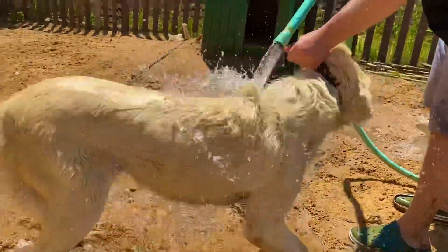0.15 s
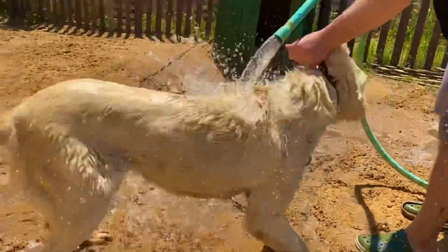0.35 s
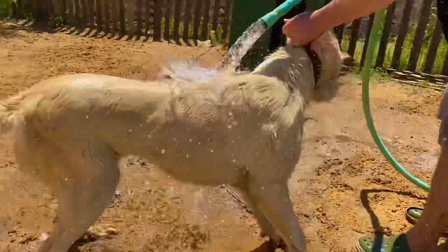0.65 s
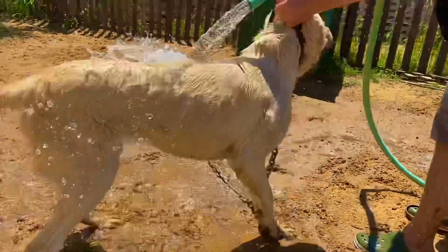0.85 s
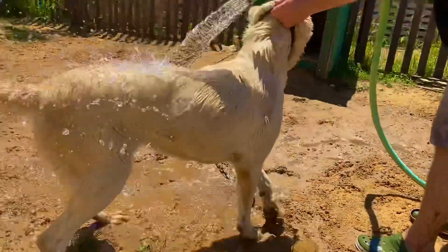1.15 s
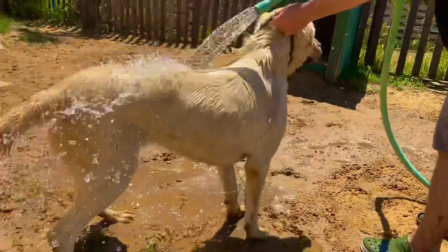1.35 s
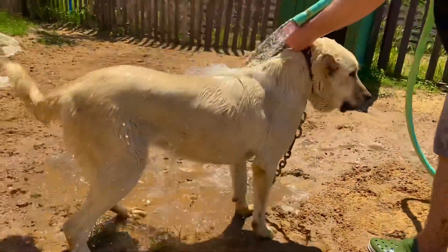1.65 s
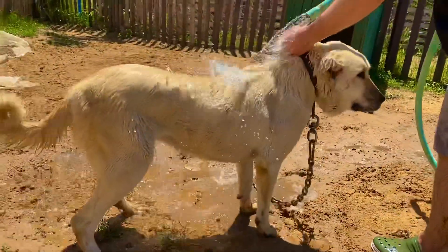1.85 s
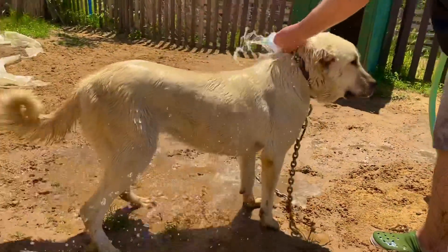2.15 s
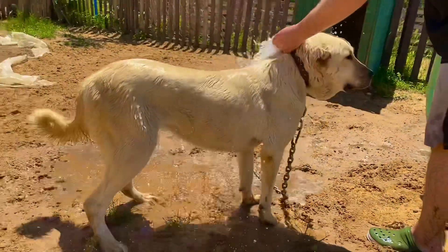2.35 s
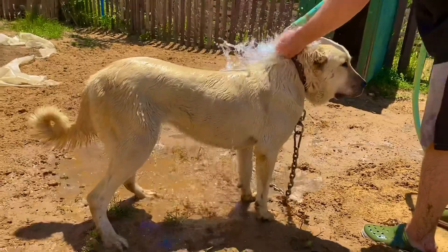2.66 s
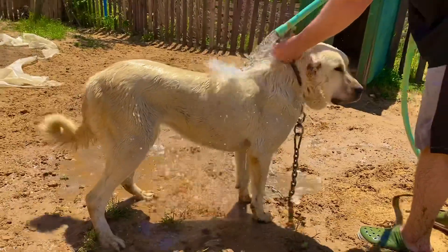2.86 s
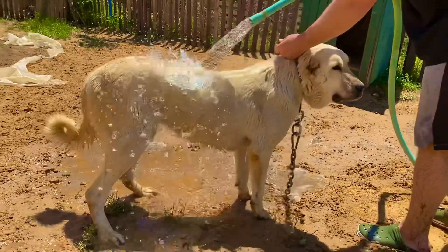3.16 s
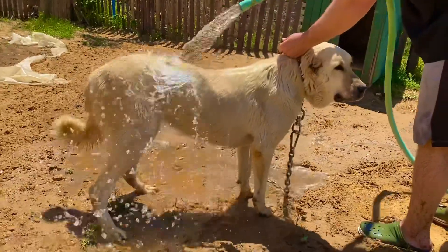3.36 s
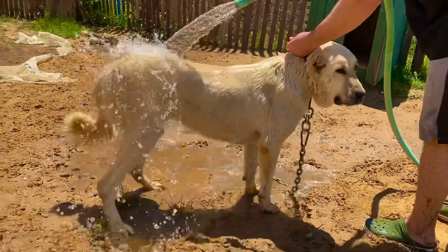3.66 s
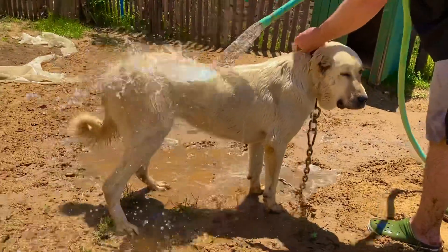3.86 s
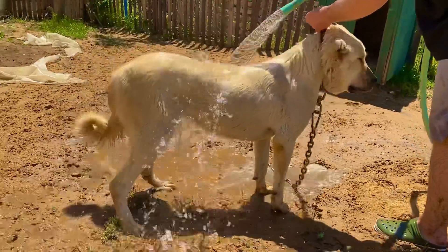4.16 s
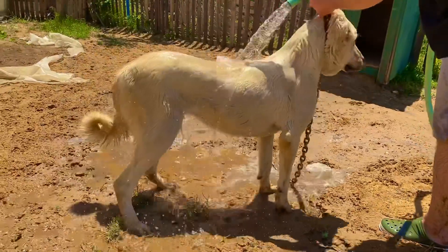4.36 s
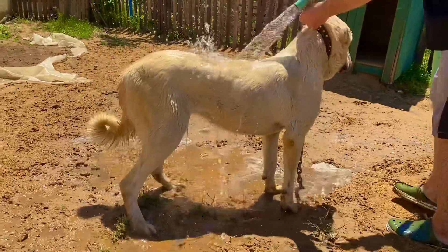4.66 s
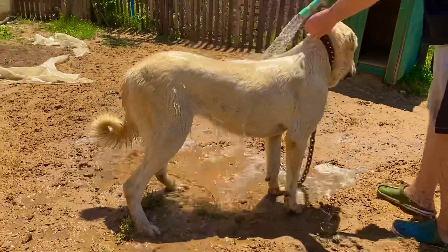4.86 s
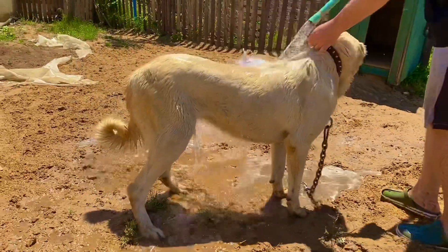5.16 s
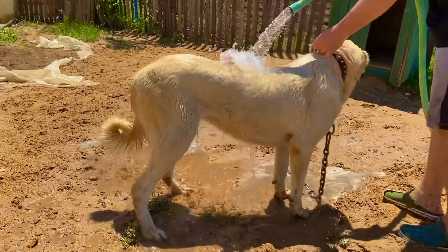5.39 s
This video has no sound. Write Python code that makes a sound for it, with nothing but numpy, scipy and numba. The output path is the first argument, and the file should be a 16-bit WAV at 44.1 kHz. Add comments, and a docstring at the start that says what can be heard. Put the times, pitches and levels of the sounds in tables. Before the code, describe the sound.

Water from a garden hose plays without pause on a large dog's wet coat in an open yard. Bright crackling drops and fine mist run throughout, with sharp wet smacks, while run-off patters and plops into mud. Low wind puffs bump the microphone often at first, thin out, return around three seconds and are strongest near the end. Phone a few metres away, dry open air.

```python
"""A hose jet plays on a big dog's wet coat in an open yard, a few metres from a phone, for 5.5 s.
Throughout, drops crackle on the fur over mist, lumps of water smack, and run-off patters and plops into mud.
Early on, wind puffs and low slops on the mud come often, then the wind thins; lumps smack hardest near 2.5 s,
plops crowd together near 2.8 s, wind returns around 3 s, and its strongest puffs come after 4.9 s.
Drops are short rings and noise ticks, lumps are noise bursts, wind is low noise with slow swings."""
import sys
import numpy as np
from scipy import signal
from scipy.fft import rfft, irfft, next_fast_len
from scipy.io import wavfile
from scipy.ndimage import uniform_filter1d
from numba import njit

SR = 44100
rng = np.random.default_rng(int(sys.argv[2]) if len(sys.argv) > 2 else 0)


def store_wav(level_fs):
    """Save 16-bit WAV to argv[1]."""
    pcm = np.round(np.clip(np.atleast_2d(level_fs), -1, 1) * 32767)
    wavfile.write(sys.argv[1], SR, pcm.T.astype(np.int16))


N = 243691  # length in samples
T = np.arange(N) / SR  # time [s]
FFT_SIZE = next_fast_len(N, True)  # padded length of the spectra
HZ = np.fft.rfftfreq(FFT_SIZE, 1 / SR) + 1  # the 1 keeps the logarithm finite


def undb(db):
    """Turn decibels into a plain gain."""
    return 10 ** (np.asarray(db) / 20)


def unit_level(x):
    """Scale both rows so that the first has an rms of 1."""
    return x / np.sqrt(np.mean(x[0] ** 2))


def colour(x, table, hiss_db=-99):
    """Even out a sound's spectrum, mix in some hiss, and give both the tone of a table."""
    table_hz, table_db = np.transpose(table)
    spectrum = rfft(x, FFT_SIZE)
    smooth_power = uniform_filter1d(np.abs(spectrum[0]) ** 2, size=1500)
    spectrum = spectrum / (np.sqrt(smooth_power) + 1e-9)
    hiss = rng.standard_normal((2, 2 * len(HZ))).view(complex) / np.sqrt(2)
    gain = undb(np.interp(np.log(HZ), np.log(table_hz), table_db, -80, -80))
    return irfft((spectrum + undb(hiss_db) * hiss) * gain, FFT_SIZE)[:, :N]


def walk(rate):
    """Random levels, each lasting 1 / rate seconds, joined by ramps; their spread is 1."""
    hold = int(SR / rate)
    steps = np.repeat(rng.standard_normal(N // hold + 1), hold)
    ramps = uniform_filter1d(steps, hold)[:N]
    return ramps / ramps.std()


@njit
def ring(start, hz, cycles, size, turn, glide, n, sr):
    """Rings that swell over their first cycles, die away and glide up; row two has another phase."""
    out = np.zeros((2, n))
    for k in range(len(start)):
        step = 2 * np.pi * hz[k] / sr
        fade = np.exp(-hz[k] / sr / cycles[k] * 3)  # down to about 1/20 after the given cycles
        length = int(2 * cycles[k] * sr / hz[k])
        swell_cycles = .6 + cycles[k] / 10
        gain, phase = size[k], 0.
        for i in range(start[k], min(start[k] + length, n)):
            phase += step * (1 + glide[k] * (i - start[k]) / length)
            gain *= fade
            swell = min(phase / (2 * np.pi * swell_cycles), 1.)
            out[0, i] += gain * swell * np.sin(phase)
            out[1, i] += gain * swell * np.sin(phase + turn[k])
    return out


def drops(per_s, lo_hz, hi_hz, cycles, spread_db, glide):
    """A rain of rings of random pitch and length (1 to 6 times cycles); most are small, a few large."""
    u = rng.random((int(per_s * N / SR), 5)).T
    start = (u[0] * N).astype(np.int64)
    hz = lo_hz * (hi_hz / lo_hz) ** u[1]
    size = undb(-spread_db * np.log(1 - .985 * u[2]))
    turn = 2 * np.pi * u[4]
    return ring(start, hz, cycles * 6 ** u[3], size, turn, np.full(len(hz), glide), N, 1. * SR)


def stream(table, grains, hiss_db, flutter_db):
    """Single drops over the hiss of those too fine to tell apart; the level flutters unevenly."""
    return unit_level(colour(grains, table, hiss_db)) * undb(flutter_db)


def burst(s, db, lo_hz, hi_hz, t60, rise=0.00027):
    """A short puff of noise in one band, peaking at db and falling 60 dB in t60 s; returns its place too."""
    t = np.arange(int(t60 * SR)) / SR
    band = signal.butter(2, [lo_hz, min(hi_hz, .45 * SR)], "band", fs=SR)
    noise = signal.lfilter(*band, rng.standard_normal((2, 4096))[:, :len(t)])
    puff = noise * (1 - np.exp(-t / rise)) * 1000 ** (-t / t60)
    return int(s * SR), puff / np.abs(puff).max(axis=1, keepdims=True) * undb(db)


def add(out, i, x):
    """Mix x into out at sample i."""
    n = min(x.shape[1], N - i)
    out[:, i:i + n] += x[:, :n]


def bumps(centre, width):
    """One smooth swell from 0 to 1 and back for each row; width [s] is taken at half height."""
    return np.cos(np.pi / 2 * np.clip((T - centre[:, None]) / width[:, None], -1, 1)) ** 2


def ground_dip(x):
    """The echo off the ground thins one band: take part of it out."""
    return x - 0.26 * signal.lfilter(*signal.iirpeak(2560, 3.5, fs=SR), x)


def wind():
    """Low turbulence: an uneven rumble, and puffs that each push the microphone for a few swings."""
    # tone of the moving air: (frequency [Hz], level per Hz [dB])
    gust_colour = [(20, -23), (35, -20), (50, 1.5), (70, -2.5), (110, -4), (170, -14.5), (300, -23)]
    # rumble before its random unevenness: (time [s], level [dB])
    rumble = [(0.0, -57), (0.2, -51), (0.8, -46.5), (1.55, -52), (1.95, -50), (2.2, -49), (2.61, -55),
              (2.86, -55), (2.95, -47), (3.17, -44), (3.59, -57.5), (4.77, -53.5), (5.09, -43), (5.53, -46)]
    # puffs hitting the microphone: (centre [s], width [s], peak of the swing [dB], pitch [Hz])
    puffs = [(0.012, 0.019, -40, 59), (0.18, 0.027, -39, 61), (0.181, 0.017, -33.5, 147.8),
             (0.371, 0.026, -41, 87.6), (0.47, 0.024, -33, 80), (0.547, 0.03, -43, 64),
             (0.61, 0.029, -36.5, 78), (0.653, 0.034, -42, 70), (0.73, 0.034, -46, 80),
             (0.774, 0.02, -43, 80), (0.818, 0.014, -41, 86), (0.854, 0.035, -44, 61),
             (0.908, 0.023, -32, 83), (0.96, 0.014, -31.5, 69), (1.044, 0.018, -44, 69),
             (1.096, 0.047, -43, 59), (1.161, 0.015, -37.5, 78), (1.239, 0.022, -32.5, 67.1),
             (1.944, 0.021, -34, 86.3), (1.988, 0.014, -32, 80), (2.301, 0.014, -39, 67),
             (2.34, 0.016, -40, 60), (2.925, 0.032, -39, 75), (2.974, 0.052, -37, 64),
             (3.059, 0.046, -48, 59), (3.169, 0.02, -32, 64), (3.199, 0.012, -37, 61),
             (3.235, 0.037, -36, 48), (3.3, 0.057, -33, 74.8), (3.403, 0.031, -28, 59.3),
             (3.465, 0.022, -45, 50), (3.67, 0.03, -43, 96), (4.283, 0.063, -43, 75),
             (4.422, 0.039, -43, 96), (4.59, 0.039, -42, 78.4), (4.735, 0.043, -43, 57),
             (4.788, 0.031, -37, 64), (4.881, 0.017, -41, 59.2), (4.913, 0.011, -30, 97),
             (4.955, 0.038, -26, 75.2), (5.006, 0.037, -30, 74), (5.165, 0.066, -35, 51),
             (5.185, 0.013, -36, 98), (5.238, 0.041, -37, 53.3), (5.272, 0.025, -36, 56),
             (5.32, 0.016, -36, 121), (5.396, 0.036, -29, 74.6), (5.459, 0.029, -25.5, 88.05),
             (5.502, 0.025, -26, 58.9)]
    tail = 1.15  # squeezes the rise of a puff and stretches its fall by this ratio
    sag = 0.23  # share of its pitch that a puff loses over one width
    rough_db = -12  # turbulence riding on each puff
    air = unit_level(colour(rng.standard_normal((2, N)), gust_colour))
    out = air * undb(np.interp(T, *np.transpose(rumble)) + 3.2 * walk(11))
    turns = 2 * np.pi * rng.random((len(puffs), 2, 1))
    for (centre, width, db, hz), turn in zip(puffs, turns):
        near = np.abs(T - centre) < width * tail
        u = (T[near] - centre) / width
        skewed = np.where(u < 0, u * tail, u / tail)
        shape = undb(db) * np.cos(np.pi / 2 * np.clip(skewed, -1, 1)) ** 2
        swing = np.sin(2 * np.pi * hz * width * (u - sag * u ** 2 / 2) + turn)
        out[:, near] += shape * (swing + undb(rough_db) * air[:, near])
    return out


def pour(slugs):
    """Dull run-off on mud: low, very short rings almost lost in hiss, nearly steady."""
    # tone: (frequency [Hz], level per Hz [dB])
    pour_colour = [(90, 2.5), (150, -3.5), (300, -2.5), (500, -4.5), (800, -6.5), (1200, -14)]
    grains = drops(300, 124, 922, cycles=1.07, spread_db=0.95, glide=0.14)
    return stream(pour_colour, grains, -0.12, 0.12 * slugs + 0.15 * walk(28))


def patter(slugs):
    """Run-off drops: short rings in the middle range over some hiss."""
    # tone: (frequency [Hz], level per Hz [dB])
    patter_colour = [(600, -23), (950, -10), (1250, -6), (1650, -4), (2100, -5.5), (2600, -12.5),
                     (3500, -8.5)]
    grains = drops(800, 796, 2860, cycles=2.6, spread_db=1.8, glide=0.2)
    return stream(patter_colour, grains, -4, 0.7 * slugs + 0.8 * walk(60))


def slops():
    """Heavy water on soft ground: broad low thuds of noise that rise gently."""
    # thuds: (time [s], peak [dB], centre of the band [Hz])
    thuds = [(0.169, -32, 153), (0.176, -28, 420), (0.262, -32.5, 280), (0.368, -28, 610), (0.45, -29, 300),
             (0.555, -30.5, 480), (0.644, -30.5, 248), (1.339, -33, 208), (1.975, -37, 403),
             (2.256, -33.5, 305), (3.303, -39, 145), (4.171, -38, 423), (4.185, -29, 480), (4.21, -32, 500),
             (4.548, -39, 320), (4.8, -34, 545), (4.922, -44, 500)]
    out = np.zeros((2, N))
    for s, db, hz in thuds:
        add(out, *burst(s, db, hz / 2.1, hz * 2.13, t60=0.051, rise=0.0059))
    return out


def plops():
    """Drops trap air in the puddle: a rough splash, and a bubble that rings briefly and rises in pitch."""
    # bubbles: (time [s], level before fading [dB], nominal pitch [Hz], length [cycles], pitch rise [share])
    bubbles = [(0.1307, -27.5, 1060, 12, 0.05), (0.1715, -30, 1080, 8.6, 0.05), (0.177, -16, 2260, 6, 0.05),
               (0.3112, -27, 1255, 8.7, 0.77), (0.3427, -24, 1860, 13, 0.05), (0.357, -29, 1290, 20, 0.05),
               (0.3712, -26, 1420, 6.8, 0.05), (0.4949, -27, 900, 5.2, 0.29), (0.5027, -23, 2010, 12, 0.35),
               (0.5596, -29.5, 1110, 24, 1.4), (0.6155, -21, 2080, 13, 0.05),
               (0.6255, -18, 2110, 7.7, 0.05), (0.651, -24, 1440, 5.6, 0.18),
               (0.7196, -25, 1980, 17.8, 0.05), (0.74, -21, 1600, 5.4, 0.3), (0.7459, -15, 1690, 7.3, 0.28),
               (0.8095, -18, 1710, 6.5, 0.05), (1.061, -14.5, 2260, 8.4, 0.06),
               (1.37, -16.5, 2480, 12, 0.27), (1.3737, -20, 1600, 7.9, 0.05),
               (1.3896, -16, 1610, 8.9, 0.24), (1.5034, -28, 1000, 7.7, 0.05),
               (1.5787, -26, 1490, 7.7, 1.1), (1.5775, -19, 2250, 8, 0.28), (1.7383, -18, 1530, 5.8, 0.05),
               (1.75, -22.5, 1560, 18, 0.74), (1.866, -16.5, 1480, 7.6, 0.17), (1.9376, -20, 2060, 9, 0.06),
               (1.9843, -25, 890, 5, 0.29), (2.0665, -17.5, 2110, 6.8, 0.05), (2.113, -19, 2470, 8.1, 0.08),
               (2.269, -24, 2080, 8.1, 0.05), (2.317, -25, 1980, 13.3, 0.05),
               (2.4517, -19, 1890, 6.6, 0.05), (2.5168, -16.5, 2100, 8.6, 0.09),
               (2.554, -25.5, 1810, 6.2, 0.07), (2.6031, -28, 1980, 8.3, 0.05),
               (2.765, -29, 1110, 10.7, 0.05), (2.7807, -28, 1300, 9, 0.3), (2.751, -23, 1700, 8, 0.1),
               (2.7885, -27, 1630, 15, 0.05), (2.7942, -17, 1710, 6, 0.05), (2.801, -25, 1550, 8.3, 0.1),
               (2.83, -35, 1040, 12, 0.05), (2.845, -21, 1790, 8.7, 0.1), (2.859, -25, 1110, 12, 0.1),
               (2.8218, -29, 1090, 25, 0.05), (2.824, -31, 1700, 17.8, 0.77), (2.8238, -26, 1940, 20, 0.81),
               (2.837, -15.5, 1600, 8.2, 0.05), (2.851, -16, 1007, 9.3, 0.05), (2.8574, -20, 1650, 7, 0.2),
               (2.986, -29, 1280, 11, 0.05), (3.1139, -24, 1850, 7.9, 0.05), (3.15, -21.5, 1860, 7.4, 0.07),
               (3.2376, -22, 2300, 8.1, 0.05), (3.2675, -26, 1870, 8.0, 0.05),
               (3.4157, -28, 1120, 14, 0.55), (3.4347, -32, 1110, 17.8, 0.05), (3.517, -30, 1090, 11, 0.05),
               (3.528, -29, 1140, 17, 0.043), (3.539, -20, 1120, 5.5, 0.05),
               (3.5832, -17.5, 1360, 6.5, 0.05), (3.603, -29, 1060, 9.5, 0.06),
               (3.6594, -27, 1500, 17, 0.78), (3.707, -29, 1470, 17.8, 1), (3.715, -28, 1170, 11, 0.1),
               (3.725, -26, 1780, 10, 0.1), (3.746, -28, 1670, 11, 0.05), (3.757, -28, 1650, 13, 0.05),
               (3.775, -26, 1500, 12, 0.05), (3.792, -29, 1650, 6.1, 0.1), (3.92, -29.5, 1030, 14, 0.81),
               (3.943, -19.5, 1830, 7.4, 0.19), (3.962, -26.5, 1730, 27, 0.11),
               (4.0276, -16, 1840, 9.4, 0.16), (4.2094, -24, 1670, 21, 0.05), (4.225, -31, 944, 17, 0.6),
               (4.2319, -18, 1790, 6.2, 0.05), (4.248, -31, 1130, 17, 0.97), (4.2863, -22, 2150, 8.7, 0.05),
               (4.38, -24, 2110, 6.8, 0.05), (4.4626, -24.5, 1770, 35, 0.11), (4.5023, -19, 1750, 12, 0.05),
               (4.5615, -24, 1120, 9.2, 0.05), (4.663, -25.5, 1680, 16.3, 0.05),
               (4.6846, -28, 1770, 21, 0.7), (4.7653, -23.5, 1670, 28, 0.05),
               (4.7881, -34, 1350, 17.5, 0.05), (4.8016, -22, 1290, 8.8, 0.25),
               (4.8076, -27, 1770, 23, 0.05), (4.861, -22, 1240, 6, 0.05), (4.93, -14.5, 1590, 8.1, 0.05),
               (4.9922, -27, 2150, 22, 0.4), (4.997, -27, 1020, 7.6, 0.75), (5.022, -23.5, 1120, 6.5, 0.12),
               (5.0937, -24, 1260, 14, 0.31), (5.1095, -27, 1360, 16.3, 1.4),
               (5.113, -16.5, 2150, 13, 0.06), (5.139, -25, 1060, 10.4, 0.37),
               (5.3156, -28, 1690, 17.8, 0.05), (5.3613, -23, 1720, 16, 0.15),
               (5.412, -21, 1600, 6.6, 0.05), (5.439, -23, 2070, 6.7, 0.05)]
    splash_db, splash_t60 = -9, 0.013  # relative to the bubble; fall time [s]
    s, db, hz, cycles, glide = np.transpose(bubbles)
    turn = np.pi / 2 * np.sign(rng.standard_normal(len(s)))  # a quarter cycle early or late
    start = (s * SR).astype(np.int64)
    start_hz = hz * (1 - glide / 6)
    out = ring(start, start_hz, np.maximum(cycles, 1), undb(db), turn, glide, N, 1. * SR)
    for k in range(len(s)):
        add(out, *burst(s[k], db[k] + splash_db, hz[k] / 1.83, hz[k] * 2, splash_t60, rise=0.00043))
    return out


def mist(slugs):
    """Fine mist: many tiny high rings over nearly as much hiss."""
    # tone: (frequency [Hz], level per Hz [dB])
    mist_colour = [(6000, -6), (8000, 3.5), (9500, 1.5), (12000, 3), (14000, 0.5), (16000, -3)]
    grains = drops(2500, 6980, 15200, cycles=4.2, spread_db=3.6, glide=0.056)
    return stream(mist_colour, grains, -1, slugs + 1.1 * walk(90))


def ticks(per_s=600, spread_db=3.2, decay_s=.0005):
    """Single drops bursting at random: noise opened for a millisecond or two."""
    # broad tone of a drop: (frequency [Hz], level per Hz [dB])
    tick_colour = [(700, -11.5), (1500, -4), (2100, -3), (2650, -10), (3300, -3), (4500, -0.5),
                   (7000, -10.5), (12000, -6.5), (16000, -4.5)]
    u = rng.random((int(per_s * N / SR), 2)).T
    gate = np.zeros(N)
    gate[(u[0] * N).astype(int)] = undb(-spread_db * np.log(1 - .97 * u[1]))
    fade = np.exp(-1 / (decay_s * SR))
    gate = signal.lfilter([1], [1, -fade], uniform_filter1d(gate, size=10))
    return unit_level(colour(gate * rng.standard_normal((2, N)), tick_colour))


def spray(slugs):
    """Spray crackling off the fur: a dense rain of bright short rings over some hiss."""
    # tone: (frequency [Hz], level per Hz [dB])
    spray_colour = [(1800, -11.5), (2500, -7.5), (3200, -4.5), (4300, -0.5), (5300, 1), (6400, -3),
                    (7800, -7), (9500, -40), (12000, -17)]
    grains = drops(3600, 2214, 8830, cycles=1.7, spread_db=2.8, glide=0.16)
    return stream(spray_colour, grains, -6, slugs + 0.3 * walk(50))


def small_smacks(count):
    """Lesser lumps at random moments, in the same columns as the large ones."""
    u = rng.random((count, 4)).T
    db = -28 + 3 * (2 * u[1] - 1)
    hz = 3020 * (7000 / 3020) ** u[2]
    mist_db = np.full(count, -17)
    return list(zip(u[0] * N / SR, db, hz, mist_db, 8 * u[3] - 3))


def snap(lo_hz, hi_hz):
    """The clean edge of a hit: one click through a wide band, peak 1, upside down in row two."""
    band = signal.butter(2, [lo_hz, hi_hz], "band", fs=SR)
    click = signal.lfilter(*band, np.eye(1, 200)[0])
    return np.array([click, -click]) / np.abs(click).max()


def smacks(t60=0.012):
    """Lumps of water burst on the coat: each snaps, rings noisily around its centre and throws some mist."""
    # lumps: (time [s], body peak before the row balance [dB], centre [Hz], mist relative to the body [dB],
    # first row minus second row [dB])
    lumps = [(0.0233, -23.5, 5400, -13, -2), (0.1094, -25, 3730, -8, -1), (0.1277, -21, 4810, -9, 4),
             (0.1325, -14.5, 4800, -16, 7), (0.2337, -19.5, 3390, -17, 0), (0.29, -22, 5630, -1, 3),
             (0.3177, -18, 3350, -11, -3), (0.3243, -21, 5840, -10, -1), (0.3341, -20, 4870, -12, 5),
             (0.3622, -18, 5310, -14, 4), (0.3732, -23, 4890, -8, 4), (0.4546, -23, 4100, -13, 1),
             (0.476, -23, 4320, -15, -1), (0.4796, -21, 3790, -8, -1), (0.4978, -25, 4020, -14, -3),
             (0.5032, -21, 4810, -11, 3), (0.508, -25, 4620, -9, 0), (0.5188, -20, 4840, -19, 0),
             (0.5472, -17, 6100, -16, 1), (0.5924, -24, 5010, -14, -1), (0.6159, -24, 4130, -8, 4),
             (0.6262, -21, 4090, -9, -1), (0.651, -20, 3740, -13, -1), (0.6543, -22, 5090, -17, 2),
             (0.672, -27, 5400, -7, 4), (0.6788, -22, 4860, -13, 5), (0.8114, -14, 4300, -24, 0),
             (0.8708, -22, 4280, -3, -1), (0.892, -23, 4080, -14, 0), (0.8954, -25, 4430, -9, 0),
             (0.9736, -28, 4600, -15, 9), (1.0244, -27, 4240, -14, 0), (1.0513, -19, 4800, -6, 5),
             (1.0703, -19, 6110, -15, -1), (1.2317, -25, 5970, -8, -3), (1.2628, -19, 5230, -16, -2),
             (1.3267, -18, 5600, -21, 5), (1.35, -19, 5920, -9, -1), (1.3783, -25, 2970, -14, 4),
             (1.3898, -22, 5790, -13, 2), (1.4253, -24, 5900, -4, 0), (1.4313, -17, 5660, -4, 1.5),
             (1.4549, -22, 5230, -13, 7), (1.4884, -21, 4390, -20, 0), (1.5193, -28, 3510, -19, -5),
             (1.5336, -16, 3930, -22, 1), (1.5755, -27, 4990, -15, -1), (1.6447, -23, 4290, -14, 2),
             (1.6517, -22, 3500, -16, 0), (1.6832, -21, 3720, -19, -1), (1.8233, -21, 3710, -10, -4),
             (1.8616, -23, 4210, -13, -5), (1.8773, -21, 3880, -14, 0), (2.0022, -21, 7020, -10, 0),
             (2.0676, -21, 5680, -4, 4), (2.1177, -30, 3960, -15, 4), (2.1752, -19, 5000, -9, 7),
             (2.1815, -22, 4870, -10, 6), (2.2004, -25, 4910, -11, 8), (2.2586, -23, 5060, -9, 4),
             (2.291, -18, 3580, -10, -2), (2.2959, -20, 3220, -12, -3), (2.3521, -29, 4200, -8, -3),
             (2.358, -22, 4660, -11, 1), (2.3959, -25, 3830, -17, -1), (2.4089, -24, 3480, -17, -3),
             (2.4324, -25, 3940, -17, -3), (2.4409, -19, 3860, -15, 1), (2.4519, -20, 3180, -9, -1),
             (2.515, -15, 6900, -7, 5), (2.5176, -11, 5060, -13, 5), (2.5203, -24, 4500, -14, 2),
             (2.5257, -16, 4100, -12, 1), (2.5293, -25, 6210, -15, -1), (2.5474, -22, 5190, -15, 2),
             (2.5586, -21, 5110, -14, -1), (2.6143, -19, 5650, -16, 2), (2.6182, -20, 4330, -11, 1),
             (2.6221, -23, 5510, -14, 1), (2.6544, -23, 5690, -14, 1), (2.6978, -22, 5100, -11, 5),
             (2.719, -22, 5640, -15, 2), (2.7939, -13.5, 3500, -17, -3), (2.8795, -20, 3290, -12, -6),
             (2.8995, -21, 3910, -15, 1), (2.909, -21, 5100, -17, 0), (2.915, -18, 6890, -13, 1),
             (2.9546, -21, 3730, -18, 2), (3.0189, -23, 4630, -14, 2), (3.0453, -25, 4790, -13, -4),
             (3.0611, -23, 3890, -19, -1), (3.0938, -18, 6440, -11, 2), (3.1148, -18, 3560, -14, 2),
             (3.1832, -21, 4710, 0, 7), (3.1914, -20, 3700, -19, 3), (3.2276, -20, 4460, -8, 2),
             (3.2357, -24, 4200, -14, -1), (3.2384, -17, 5770, -1, 1), (3.2925, -23, 4200, -18, 0),
             (3.3069, -21, 5020, -14, 4), (3.3174, -18, 4320, -19, 2), (3.3443, -25, 3750, -13, 0),
             (3.3542, -21, 5370, -17, 5), (3.3945, -23, 4190, -17, 2), (3.4165, -21, 4470, -16, -2),
             (3.4405, -21, 3240, -16, -4), (3.4929, -22, 4740, -11, -2), (3.5458, -24, 4280, -8, 0),
             (3.5485, -27, 3850, -8, -1), (3.5602, -20, 5360, -10, -2), (3.5828, -24, 4700, -9, 2),
             (3.6637, -23, 4820, -10, 1), (3.7016, -25, 5050, -14, 5), (3.7161, -19, 7130, -7, 3),
             (3.7682, -22, 4820, -4, 2), (3.8728, -19, 4220, -20, 0), (3.9115, -20.5, 3230, -20, 2),
             (3.9293, -19, 4240, -16, -6), (4.0069, -20, 5100, -8, -1), (4.0181, -16.5, 5780, -20, 2),
             (4.0377, -29, 5140, -15, -1), (4.0484, -25, 5180, -16, 0), (4.0517, -26, 6100, -12, -3),
             (4.0626, -23, 6340, -17, 0), (4.1054, -22, 5080, -16, 3), (4.115, -26, 4370, -6, 1),
             (4.1297, -19, 4710, -16, -2), (4.1552, -22, 4920, -10, 2), (4.1686, -24, 4390, -4, 2),
             (4.1749, -18, 6680, -12, 5), (4.1806, -17, 4780, -12, 1), (4.1908, -19, 6460, -6, 1),
             (4.1945, -17, 5350, -7, 3), (4.2017, -22, 6450, -8, 0), (4.2109, -19, 3670, -6, 0),
             (4.2162, -20, 4410, -9, 3), (4.2603, -18, 3740, -12, 0), (4.2866, -21, 3480, -18, -2),
             (4.29, -23, 3890, -11, -2), (4.3074, -22, 3690, -9, -3), (4.3267, -27, 5310, -12, 2),
             (4.3511, -24, 6050, -13, -1), (4.3939, -21, 3270, -7, 1), (4.4, -24, 4480, -8, 1),
             (4.4293, -29, 4610, -17, -1), (4.4995, -20, 5000, -16, 4), (4.691, -21, 3250, -25, -4),
             (4.7471, -22, 4070, -21, 2), (4.7506, -24, 3200, -20, -5), (4.7781, -22, 4370, -20, -1),
             (4.7916, -21, 3740, -11, -3), (4.8923, -25, 3570, -17, -1), (4.9296, -18, 4640, -13, -1),
             (4.9505, -23, 3860, -17, 3), (4.988, -24, 6010, -16, 4), (4.9986, -21, 6090, -15, -2),
             (5.0186, -17.5, 5900, -15, 1), (5.0638, -21, 4350, -17, 2), (5.1075, -23, 3340, -17, -2),
             (5.1135, -20, 3950, -14, -1), (5.2072, -20, 3710, -12, 4), (5.2143, -17, 3950, -14, -3),
             (5.2732, -22, 5380, -11, 2), (5.2794, -26, 5520, -16, 2), (5.3243, -20, 5830, -17, 1),
             (5.5008, -23, 4690, -20, -1)]
    snap_db = -1  # clean edge, relative to the body
    crack_db, crack_t60 = -9, 0.0044  # broad crack at the front, relative to the body; fall time [s]
    out = np.zeros((2, N))
    for s, db, hz, mist_db, balance_db in list(lumps) + small_smacks(count=30):
        side = undb(np.array([[.5], [-.5]]) * balance_db)
        i, body = burst(s, db, hz / 1.31, hz * 1.18, t60)
        crack = burst(s, db + crack_db, 1430, 9100, crack_t60)[1]
        thrown_mist = burst(s, db + mist_db, 12000, 14000, t60)[1]
        add(out, i + 12, side * undb(db + snap_db) * snap(hz / 3.2, hz * 2.4))
        add(out, i, side * crack)
        add(out, i, side * (body + thrown_mist))
    return out


def scene():
    """Mix all sources: row one reaches both ports, row two is what only the right port hears."""
    # slow drift as the jet wanders over the dog, before flutter and surges:
    # (time [s], spray on the coat [dB], fine mist [dB], run-off patter [dB], dull pour on mud [dB])
    flow = [(0.0, -38, -44, -42, -46), (0.14, -39.5, -46.5, -45.5, -49), (0.32, -39, -37, -42, -47),
            (0.72, -37, -40.5, -40.5, -48), (0.89, -35, -37.5, -40, -50), (1.05, -39.5, -41.5, -45, -49),
            (1.28, -38, -44, -41, -49), (1.43, -39, -39.5, -42.5, -47), (1.68, -40.5, -47, -48, -51.5),
            (1.81, -35, -40.5, -42, -47.5), (2.2, -41, -42.5, -44.5, -50), (2.52, -37, -39.5, -42.5, -45.5),
            (2.72, -33.5, -40.5, -42, -49.5), (3.05, -37, -40, -42.5, -51), (3.22, -35, -40, -43, -50.5),
            (3.68, -40.5, -38.5, -40.5, -45.5), (4.08, -36.5, -40, -43, -46),
            (4.26, -32.5, -38.5, -45.5, -46), (4.62, -36, -43, -37.5, -47.5),
            (4.86, -39, -43.5, -39.5, -49.5), (5.12, -33, -37.5, -43, -49.5),
            (5.53, -37, -43.5, -42, -49.5)]
    # sheets of water breaking off at once, and brief lulls (negative):
    # (centre [s], width [s], spray rise [dB], mist rise [dB], run-off rise [dB])
    surges = [(0.128, 0.12, 7, 12.5, 3.5), (0.362, 0.064, 6, 1, -1.5), (0.462, 0.13, 5, -0.5, 1),
              (0.648, 0.099, 2.5, 3, -1), (1.24, 0.031, 4, 4, 0), (1.15, 0.1, -3, -2, -2),
              (1.38, 0.027, 2, 1, -2), (1.575, 0.013, 5.5, 3, 6), (1.647, 0.032, 6.5, 8, 5),
              (1.732, 0.11, 2.5, 9, 6), (1.865, 0.021, 3.5, 2, 3), (2.12, 0.0095, 5, 6, 3),
              (2.155, .035, -2.5, -4, 0), (2.27, 0.07, 6, 7.5, 0.5), (2.38, 0.023, -2.5, -2, -1),
              (2.49, 0.02, 0, 0, -5), (2.53, 0.027, 6, 2, -1.5), (2.62, 0.045, 2.5, 2.5, 1.5),
              (2.792, 0.034, 4.5, 5, 3.5), (2.852, 0.064, 2.5, 0.5, 5), (2.913, 0.042, 3, 2, 0.5),
              (3.318, 0.053, 0.5, 2.5, 1.5), (3.558, 0.065, 1, 0.5, -2), (3.708, 0.15, 5, 4, -0.5),
              (3.75, 0.068, -2.5, 0, 1.5), (4.192, 0.058, 5.5, 10.5, 4.5), (4.292, 0.17, -0.5, 3.5, 2.5),
              (4.558, 0.079, 0, 0.5, 2.5), (4.778, 0.052, 4.5, -3, 0), (4.944, 0.046, 5.5, 6, 5),
              (5.158, 0.056, -3, -0.5, 2)]
    s, *cols = np.transpose(flow)
    spray_db, mist_db, patter_db, pour_db = (np.interp(T, s, c) for c in cols)
    centre, width, *rise_db = np.transpose(surges)
    spray_up, mist_up, runoff_up = np.array(rise_db) @ bumps(centre, width)
    slugs = 1.12 * walk(35) + 0.45 * walk(100)  # the jet comes in uneven slugs [dB]
    crackle = spray(slugs) + ticks() * undb(-5.5)
    coat = crackle * undb(spray_db + spray_up) + mist(slugs) * undb(mist_db + mist_up)
    runoff = patter(slugs) * undb(patter_db) + pour(slugs) * undb(pour_db)
    hits = ground_dip(smacks() + plops())
    return wind() + runoff * undb(runoff_up) + slops() + coat + hits


def record(dry):
    """The right port lags or leads by band and hears part of the sound on its own; the top is cut."""
    # right port against the left: (frequency [Hz], phase ahead [rad], likeness [0-1], level [dB])
    ports = [(50, 0.54, 0.97, -0.5), (710, -0.5, 0.75, -2.5), (1720, -0.15, 0.29, -0.5),
             (2620, -1.33, 0.86, -3), (3200, 0.2, 0.4, 0.5), (3930, -1, 0.26, -2), (5440, 1.25, 0.87, -9.5),
             (6650, 0.2, 0, 0), (6760, -0.17, 1, -1.5), (18120, 16.6, 0.98, 1.5)]
    port_hz, *cols = np.transpose(ports)
    ahead, alike, right_db = (np.interp(HZ, port_hz, c) for c in cols)
    alike = np.clip(alike, 0, 1)
    shared, own = rfft(dry, FFT_SIZE)
    right = alike * np.exp(1j * ahead) * shared + np.sqrt(1 - alike ** 2) * own
    pair = np.array([dry[0], irfft(undb(right_db) * right, FFT_SIZE)[:N]])
    top_cut = signal.ellip(10, .2, 80, 15650, fs=SR, output="sos")  # steep low-pass at 15650 Hz
    return signal.sosfilt(top_cut, pair)


dry = scene()
out = record(dry)
store_wav(out)
```